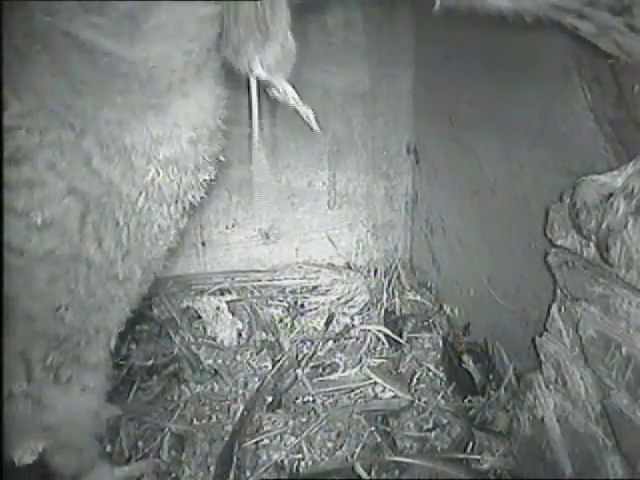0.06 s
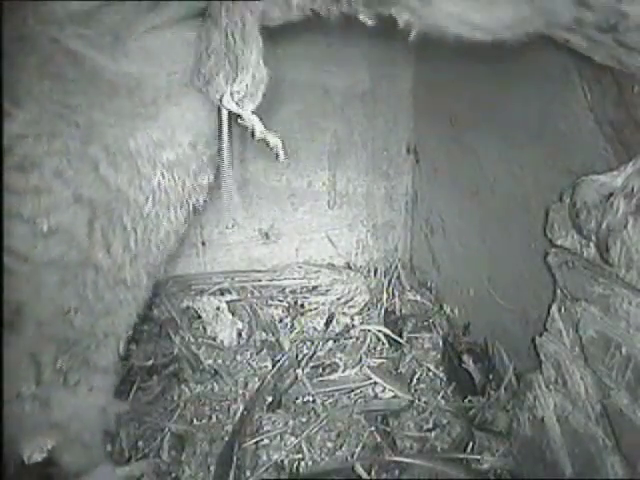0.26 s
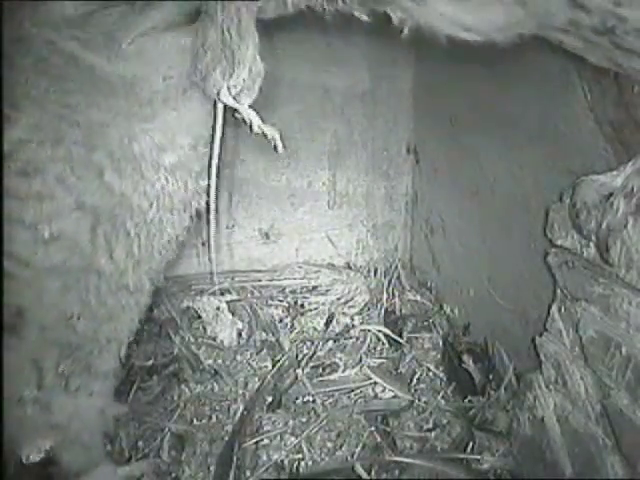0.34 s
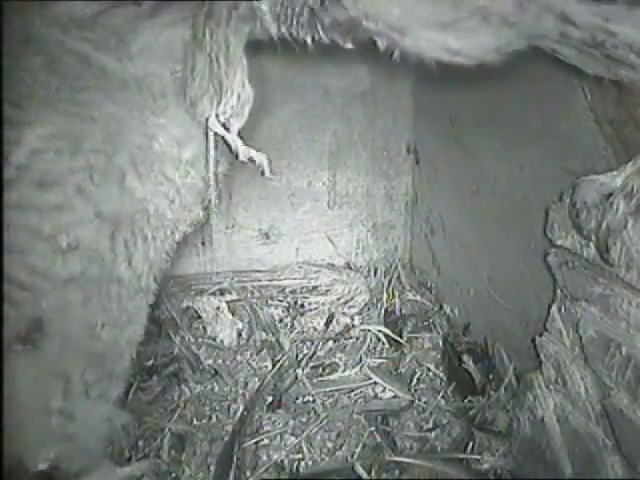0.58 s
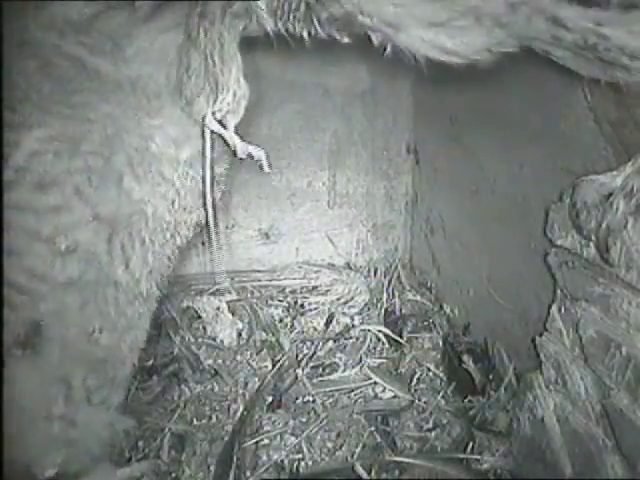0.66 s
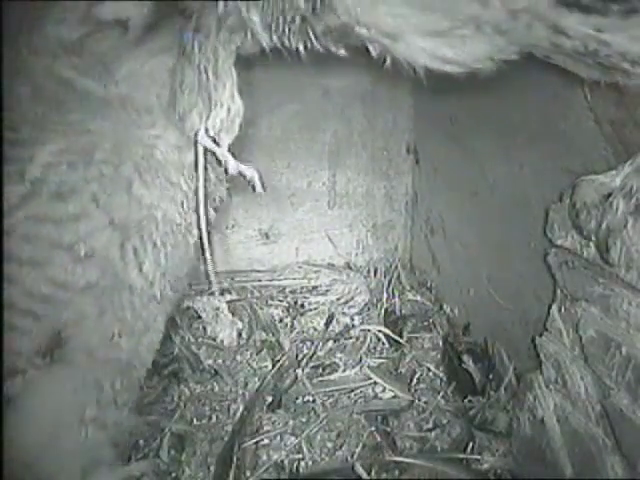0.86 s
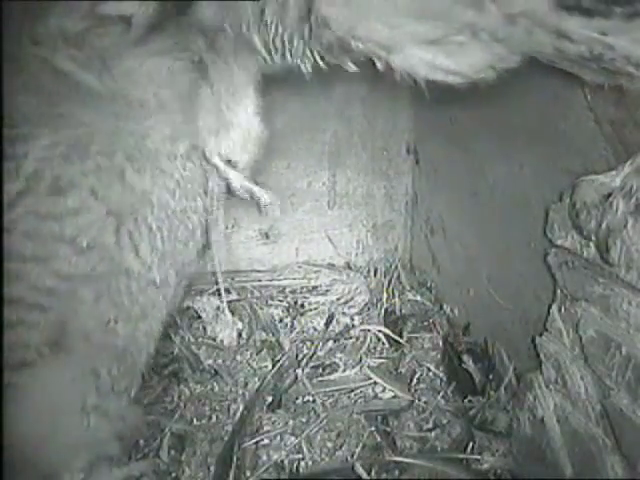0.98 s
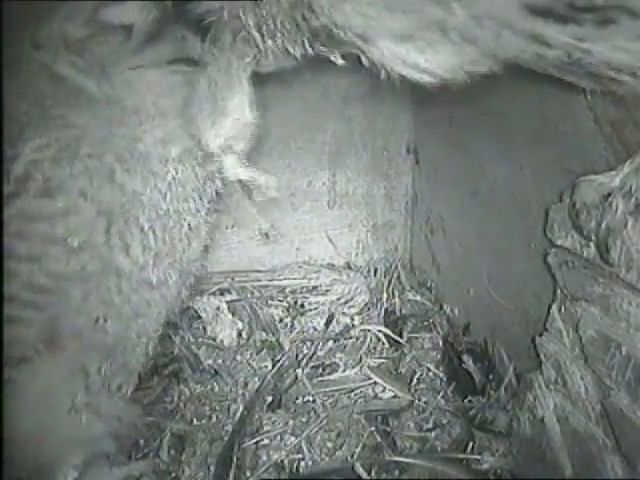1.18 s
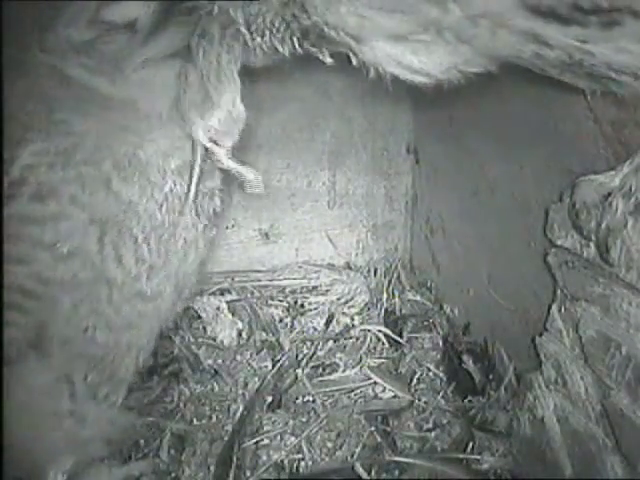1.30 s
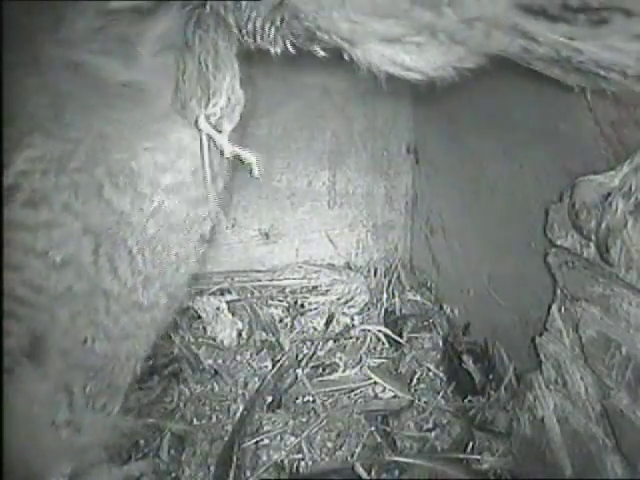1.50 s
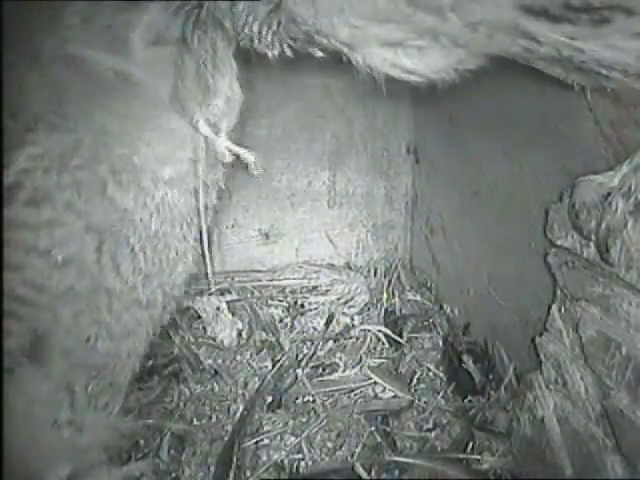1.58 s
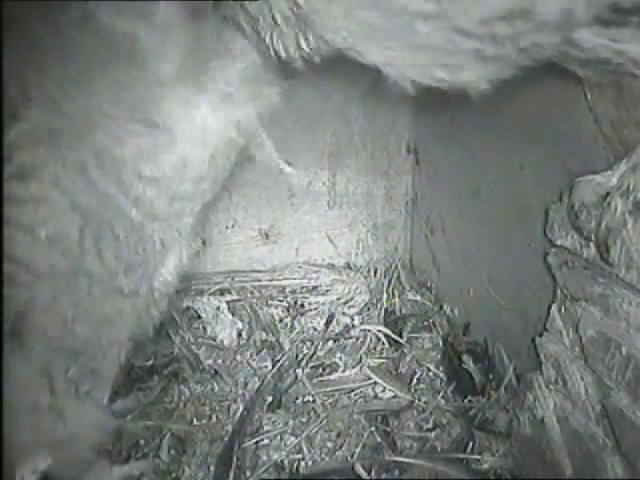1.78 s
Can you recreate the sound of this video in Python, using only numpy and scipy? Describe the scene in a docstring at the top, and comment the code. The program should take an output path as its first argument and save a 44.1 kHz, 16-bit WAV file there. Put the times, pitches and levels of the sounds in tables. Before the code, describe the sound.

Owls give six short, low calls in quick succession inside a wooden nest box, with a soft bump midway and slight rustling. The close microphone, heard on the right, adds a faint whine and buzz over steady low outdoor noise.

```python
"""Owls in a wooden nest box

Owls give short, low, nearly pure calls. Most open with a rasp, drop in pitch and lift again at the end.
Outside is a steady low wash; inside, a soft bump and a little rustling. The box microphone, heard on
the right, adds mains buzz and a thin whine that the calls modulate, and it squashes one side of loud
waves. The left channel carries only faint circuit noise."""
import sys
import numpy as np
from scipy import signal
from scipy.fft import rfft, irfft
from scipy.io import wavfile
from scipy.ndimage import uniform_filter1d

SR = 44100
rng = np.random.default_rng(int(sys.argv[2]) if len(sys.argv) > 2 else 0)


def output_pcm(signal):
    """Save a mono or channel-first signal as 16-bit PCM at the path in sys.argv[1].

    Samples are clipped to [-1, 1] before scaling.
    """
    pcm = np.clip(np.atleast_2d(signal).T, -1, 1) * 32767
    wavfile.write(sys.argv[1], SR, np.round(pcm).astype(np.int16))


N = 81585


def undb(db):
    """Amplitude ratio of a level: a factor of ten for every 20 dB."""
    return 10 ** (np.asarray(db) / 20)


def clock():
    """Uniform sampling: t/s of each sample."""
    return np.arange(N) / SR


def unit(x):
    """Normalisation to an rms of 1."""
    return x / np.sqrt(np.mean(x ** 2))


def noise(points):
    """Spectral shaping: unit-rms noise that follows (f/Hz, level/dB) points and falls away outside them."""
    hz, db = np.array(points, float).T
    log_f = np.log(np.arange(N // 2 + 1) * SR / N + 1)
    outside = np.maximum(np.log(hz[0]) - log_f, 0) + np.maximum(log_f - np.log(hz[-1]), 0)
    gain = undb(np.interp(log_f, np.log(hz), db) - 13 * outside)
    return unit(irfft(rfft(rng.standard_normal(N)) * gain, N))


def band(hz, width_hz):
    """Resonance: unit-rms noise filtered by one steep peak."""
    f = np.arange(N // 2 + 1) * SR / N + 1
    detuning = (f - hz * hz / f) / width_hz
    return unit(irfft(rfft(rng.standard_normal(N)) / (1 + detuning ** 2), N))


def drift(rate_hz):
    """Random fluctuation: unit-rms noise averaged twice over 1 / rate_hz."""
    span = int(SR / rate_hz)
    return unit(uniform_filter1d(uniform_filter1d(rng.standard_normal(N), span), span))


def arch(start, length):
    """A half-sine envelope: one smooth rise and fall."""
    return np.sin(np.pi * np.clip((clock() - start) / length, 0, 1))


def glides(table, waver):
    """Frequency modulation: each tone slides linearly in frequency with a slight random waver."""
    out = 0
    for start, length, from_hz, to_hz, db in table:
        hz = np.interp(clock(), [start, start + length], [from_hz, to_hz]) * (1 + waver * drift(90))
        out = out + undb(db) * arch(start, length) * np.sqrt(2) * np.sin(2 * np.pi * np.cumsum(hz) / SR)
    return out


def outdoors():
    """Ambient noise: a steady wash and rumble, with faint far tones and chirps superposed."""
    # spectra of the wash and the rumble: f/Hz, relative density/dB
    wash_spectrum = [(160, -44), (280, -9.5), (322, -16.5), (395, -3), (624, -7.5), (718, -0.5), (803, -12),
                     (1080, -17.5), (2600, -41), (3380, -45), (5720, -120)]
    rumble_spectrum = [(20, -12), (38, -11), (56, -1.5), (80, -2), (102, -10.5), (125, -19), (220, -27.5),
                       (500, -74)]
    # sagging far tones and thin chirps: start t/s, duration/s, start f/Hz, end f/Hz, level/dB
    far_tones = [(-.05, 0.5, 505, 471.3, -45), (.62, 0.18, 433, 367, -46), (1.27, 0.088, 399.6, 374, -41)]
    chirps = [(-.004, 0.023, 7000, 7500, -58.5), (.024, 0.0199, 4430, 3520, -52.5),
              (1.539, 0.012, 2600, 2300, -52)]
    wash = undb(-44.5 + 0.31 * drift(23)) * noise(wash_spectrum)
    rumble = undb(-43.5) * noise(rumble_spectrum)
    return wash + rumble + glides(far_tones, waver=0.014) + glides(chirps, waver=0.0067)


def electronics():
    """Electrical interference: mains harmonics and one damped tick a cycle, with steady whine and hiss."""
    # mains buzz: harmonic number, level/dB
    buzz = [(1, -57.5), (2, -65.5), (3, -61), (4, -59), (5, -60), (6, -60), (7, -60), (8, -54.5),
            (9, -71.5)]
    # steady lines of the whine and fainter tones among the buzz: f/Hz, level/dB
    whine = [(3876, -74), (3924, -69), (5076, -78), (6627, -82), (7773, -77), (7827, -68), (8974, -77),
             (10325, -72), (10347, -71), (11676, -75), (11703, -71), (11725, -57), (12877, -77),
             (14427, -88)]
    faint_tones = [(2700, -82), (2750, -81.5), (5425, -82.5), (6300, -83.5)]
    # hiss spectrum: f/Hz, relative density/dB
    hiss_spectrum = [(1500, 8.5), (2600, 2.5), (3400, -8), (5000, -2.5), (8000, -1.5), (10000, -2),
                     (11600, 1.5), (13000, -2.5), (15500, -5.5)]
    mains_hz, tick_hz, tick_offset_s, tick_decay_s = 50, 2100, 0.0066, 0.0002
    t = clock()
    lines = [(round(k) * mains_hz, db) for k, db in buzz] + list(whine) + list(faint_tones)
    tones = sum(undb(db) * np.sqrt(2) * np.sin(2 * np.pi * (hz * t + rng.random())) for hz, db in lines)
    age = (t - tick_offset_s) % (1 / mains_hz)
    ticks = unit(np.exp(-age / tick_decay_s) * np.sin(2 * np.pi * tick_hz * age))
    return tones + undb(-73) * ticks + undb(-66) * noise(hiss_spectrum)


def circuit_noise():
    """Noise floor: a channel with no signal still carries the faint noise of its circuit."""
    # noise spectrum: f/Hz, relative density/dB
    floor_spectrum = [(20, 11), (40, 0), (90, -13), (180, -3), (350, -14), (700, -27), (1400, -29),
                      (2800, -35), (5600, -33), (10000, -28), (14000, -25), (15500, -32)]
    return undb(-83) * noise(floor_spectrum)


def bump():
    """Free vibration: a bird bumps the box softly and its modes decay exponentially."""
    # modes of the box: f/Hz, T60/s, relative level/dB
    modes = [(84, 0.47, -3), (142, 0.14, -3.5), (292, 0.065, -4), (336, 0.082, 0)]
    start_s, attack_s = 0.775, 0.0039
    age = np.maximum(clock() - start_s, 0)
    ring = -sum(undb(db - 60 * age / t60) * np.sin(2 * np.pi * hz * age) for hz, t60, db in modes)
    attack = 1 - np.exp(-(age / attack_s) ** 2)
    return undb(-27.5) * ring * attack


def rustling():
    """Friction noise: feathers and bedding give a broad spectrum, claws and straw narrow high bands."""
    # stirs of feathers and bedding: middle t/s, duration/s, level/dB
    stirs = [(0.762, 0.26, -66), (1.63, 0.055, -58), (1.781, 0.18, -56)]
    # their spectrum: f/Hz, relative density/dB
    stir_spectrum = [(400, -5), (900, -0.5), (1900, 2), (3000, -18), (6000, -17), (9000, -23), (14000, -35)]
    # scratches of claws and straw: middle t/s, duration/s, centre f/Hz, level/dB
    scratches = [(.73, 0.047, 6070, -70), (0.775, .09, 7800, -74), (1.628, .04, 6000, -69),
                 (1.71, 0.055, 7650, -69), (1.766, .03, 5840, -62.5), (1.776, .22, 8600, -75)]
    stir_envelope = sum(undb(db) * arch(middle - length / 2, length) for middle, length, db in stirs)
    scratch = sum(undb(db) * arch(middle - length / 2, length) * band(hz, width_hz=930)
                  for middle, length, hz, db in scratches)
    return (stir_envelope * noise(stir_spectrum) + scratch) * undb(2.8 * drift(90))


def box(x):
    """Reverberation: the small, padded box adds a very brief decaying tail to the direct sound."""
    t60_s, top_hz = 0.072, 1520
    tail = (band(top_hz / 2, top_hz) * undb(-60 * clock() / t60_s))[:SR // 4]
    tail = tail / np.sqrt(np.sum(tail ** 2) * SR / 2 / top_hz)  # roughly unit gain in its band
    return x + undb(-19) * signal.fftconvolve(x, tail)[:N]


def puffs():
    """Breath noise: a dull puff as a bird pushes out each of the stronger calls."""
    # puffs: start t/s, duration/s, centre f/Hz, level/dB
    bursts = [(0.197, 0.017, 204, -39.5), (0.539, 0.028, 166, -42), (0.886, 0.038, 310, -39.5),
              (1.202, 0.036, 356, -36)]
    return sum(undb(db) * arch(start, length) * band(hz, width_hz=240) for start, length, hz, db in bursts)


def rasps():
    """Onset transient: an unsteady, falling vibration swells before the voice settles on its pitch."""
    # rasps: start t/s, duration/s, level/dB at the top of the swell
    onsets = [(0.187, 0.015, -27), (.536, 0.0088, -29.5), (.852, 0.015, -28.5), (1.194, 0.024, -31),
              (1.545, 0.024, -34)]
    from_hz, to_hz, jitter = 1330, 1051, 0.16
    swell_db, shimmer_db = 9, 2
    out = 0
    for start, length, db in onsets:
        progress = np.clip((clock() - start) / length, 0, 1)
        hz = (from_hz + (to_hz - from_hz) * progress) * (1 + jitter * drift(700))
        tone = unit(np.sin(2 * np.pi * np.cumsum(hz) / SR) * undb(shimmer_db * drift(600)))
        gate = (progress > 0) * (progress < 1)
        envelope = uniform_filter1d(gate * undb(db + swell_db * (progress - 1)), size=90)
        out = out + envelope * (tone + undb(-4) * band(1085, width_hz=340))
    return out


def call(contour, bright_db):
    """Harmonic vibration: a near-sine voice with weak overtones, slight tremor and a little air."""
    # overtones of the voice: harmonic number, relative level/dB
    overtones = [(2, -23), (3, -37), (4, -74)]
    # hiss that rides on the voice: f/Hz, relative density/dB
    hiss_spectrum = [(2000, -5), (2700, -12), (4000, -8), (6000, 3.5), (9000, -1), (12000, 0.5),
                     (15500, -4)]
    jitter, shimmer_db, edge_s = 0.01, 0.4, 0.005
    gain_db, reference_db = 1.39, -22.5
    t = clock()
    times, hz, db = np.array(contour, float).T
    phase = 2 * np.pi * np.cumsum(np.interp(t, times, hz) * (1 + jitter * drift(304))) / SR
    gate = np.clip(1 + np.minimum(t - times[0], times[-1] - t) / edge_s, 0, 1)
    level_db = np.interp(t, times, db) + gain_db + shimmer_db * drift(170)
    envelope = np.abs(uniform_filter1d(gate * undb(level_db), size=30))
    # with an exponent below 1, the overtones fade more slowly than the fundamental
    overtone_envelope = undb(reference_db + bright_db) * (envelope / undb(reference_db)) ** 0.74
    overtone_wave = sum(undb(level) * np.cos(round(k) * phase) for k, level in overtones)
    voice = envelope * np.cos(phase) + overtone_envelope * overtone_wave
    air = undb(-35) * band(950, width_hz=920) + undb(-42) * noise(hiss_spectrum)
    return np.sqrt(2) * voice + envelope * air


def owls():
    """Frequency and amplitude modulation: six calls follow their contours, joined by rasps and puffs."""
    # contours of the calls: t/s, fundamental f/Hz, relative level/dB
    call_1 = [(0.1995, 978, -40), (0.2025, 775, -15), (0.207, 672, -12), (0.22, 658, -15.5),
              (0.238, 611, -22), (0.25, 628, -26), (0.258, 714, -16.5), (0.268, 781, -19.5),
              (0.275, 820, -29.5), (0.28, 560, -40)]
    call_2 = [(0.546, 974, -27), (0.547, 789, -15), (0.552, 668, -14.5), (0.567, 648, -18),
              (0.576, 599, -24), (0.598, 605.6, -22.5), (0.609, 699, -25.5), (0.614, 721, -15),
              (0.62, 776, -21.5), (0.626, 700, -42)]
    call_3 = [(0.868, 946, -25.5), (0.8702, 726, -13), (0.875, 654, -16.5), (0.898, 627, -22.5),
              (0.921, 615, -25), (0.953, 656.5, -22), (0.96, 740, -16), (0.965, 827, -22.5),
              (0.974, 775, -40)]
    call_4 = [(0.998, 770, -37), (1.002, 838, -25.5), (1.007, 820, -15), (1.021, 849, -22.5),
              (1.027, 788, -26), (1.029, 866, -43.5)]
    call_5 = [(1.209, 1116, -38), (1.214, 857, -15.5), (1.22, 756, -13.5), (1.228, 657.6, -17.5),
              (1.246, 639, -24), (1.259, 615, -30), (1.274, 661, -34.5), (1.278, 870, -50),
              (1.2839, 687, -20.5), (1.291, 602, -36)]
    call_6 = [(1.557, 855.4, -33.5), (1.565, 1102, -30.5), (1.57, 737, -16.5), (1.575, 650, -22.5),
              (1.582, 583, -34.5), (1.591, 659, -38), (1.602, 605, -27), (1.611, 576, -34),
              (1.613, 660, -26), (1.617, 577, -41)]
    # overtone lift of each call in turn: gain/dB
    brightness = [3, 2.5, 2, -2, 0, 1.5]
    contours = (call_1, call_2, call_3, call_4, call_5, call_6)
    return sum(call(contour, db) for contour, db in zip(contours, brightness)) + rasps() + puffs()


def scene():
    """Superposition: all sources add at one microphone in the box, which feeds the right channel."""
    microphone = box(owls()) + bump() + rustling() + outdoors() + electronics()
    return np.array([circuit_noise(), microphone])


def record(dry):
    """Asymmetric saturation flattens loud troughs; modulation puts sidebands around the whine carriers."""
    # whine carriers: f/Hz, level/dB of each sideband relative to the signal
    carriers = [(3902, -37.5), (7826, -44.5), (11704, -48.5)]
    trough_limit, sharpness = 0.23, 4.2
    right_gain_db, low_cut_hz, high_cut_hz = 6.5, 25, 15700
    trough_depth = np.maximum(-dry, 0) / trough_limit
    x = dry / (1 + trough_depth ** sharpness) ** (1 / sharpness)
    x = x * (1 + sum(2 * undb(db) * np.cos(2 * np.pi * hz * clock()) for hz, db in carriers))
    x = np.array([x[0], undb(right_gain_db) * x[1]])
    x = signal.sosfilt(signal.butter(1, low_cut_hz, "high", fs=SR, output="sos"), x)
    return signal.sosfilt(signal.ellip(10, .1, 90, high_cut_hz, fs=SR, output="sos"), x)


dry = scene()
out = record(dry)
output_pcm(out)
```